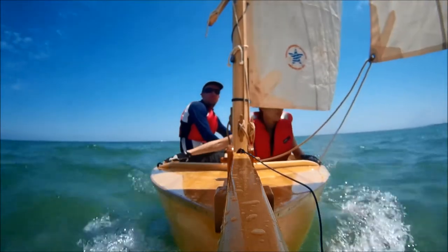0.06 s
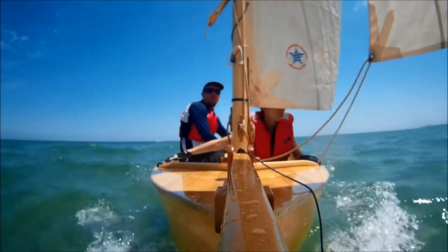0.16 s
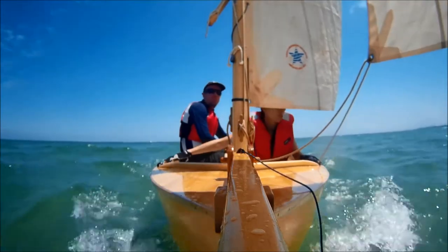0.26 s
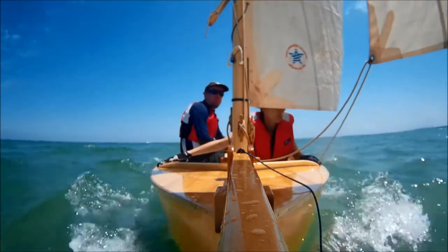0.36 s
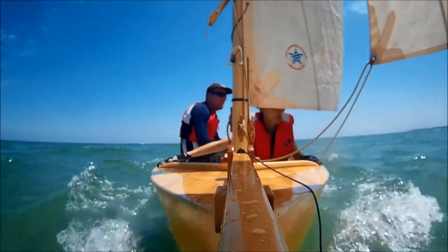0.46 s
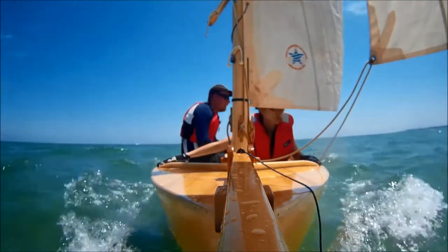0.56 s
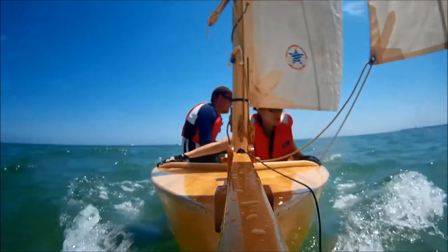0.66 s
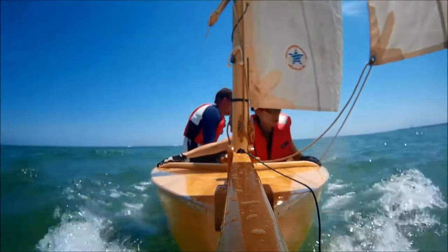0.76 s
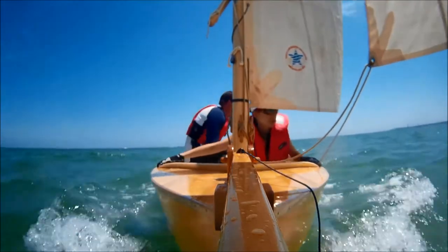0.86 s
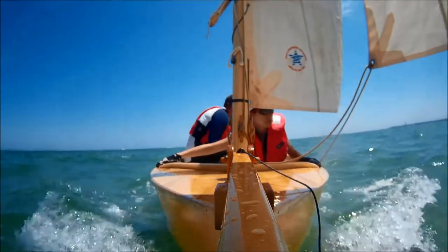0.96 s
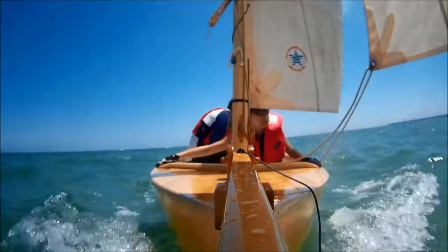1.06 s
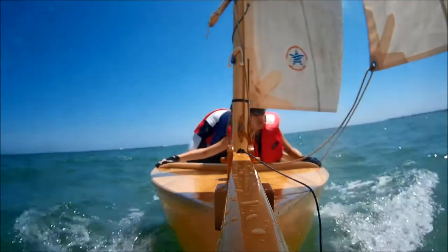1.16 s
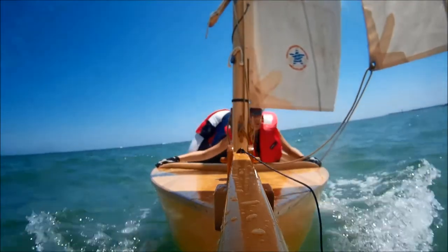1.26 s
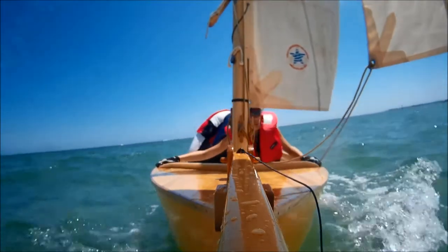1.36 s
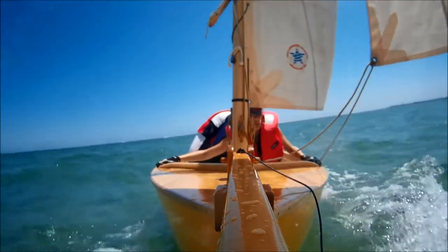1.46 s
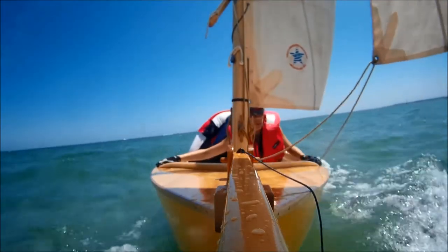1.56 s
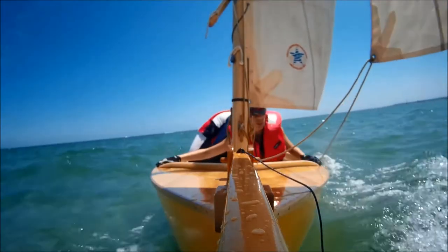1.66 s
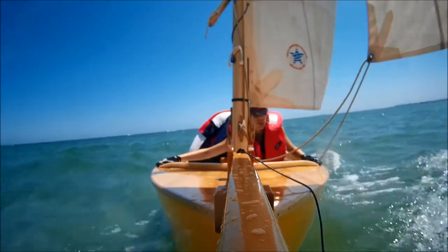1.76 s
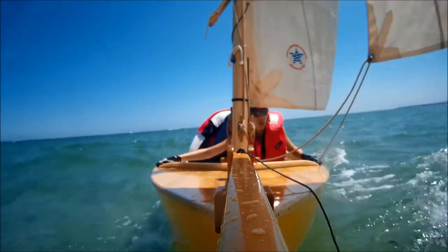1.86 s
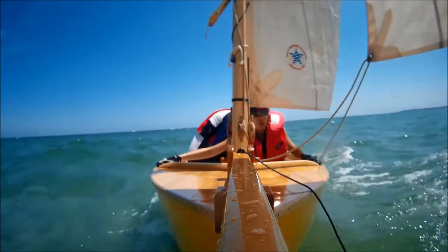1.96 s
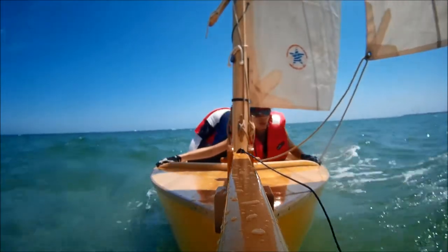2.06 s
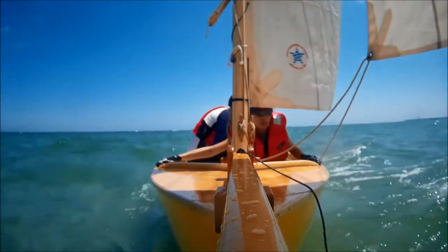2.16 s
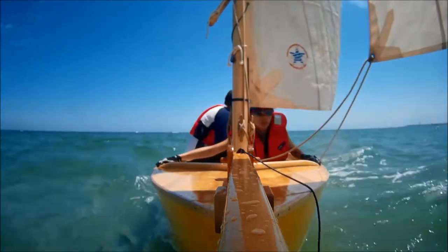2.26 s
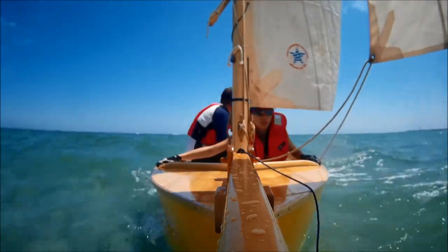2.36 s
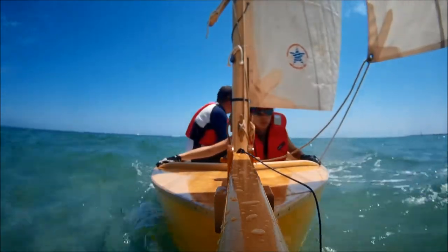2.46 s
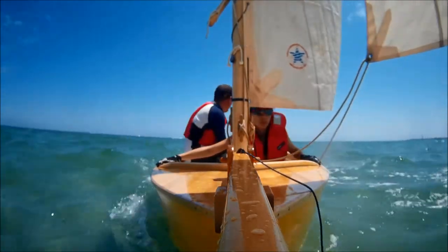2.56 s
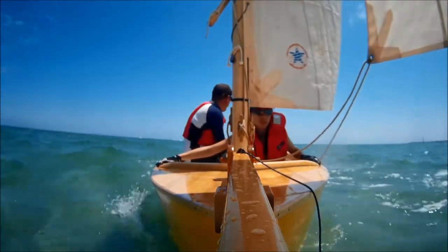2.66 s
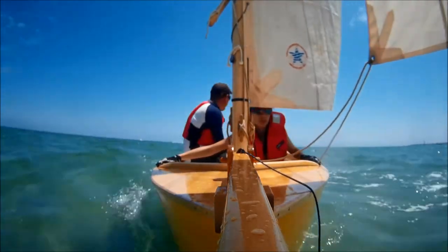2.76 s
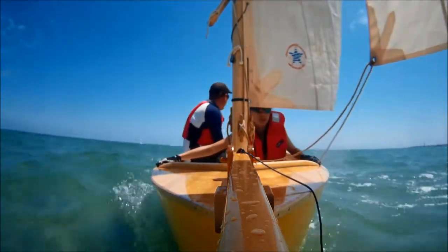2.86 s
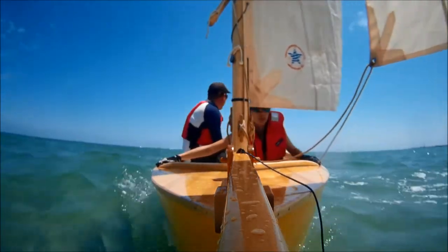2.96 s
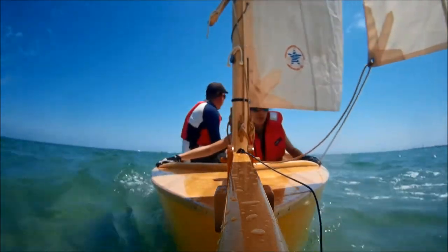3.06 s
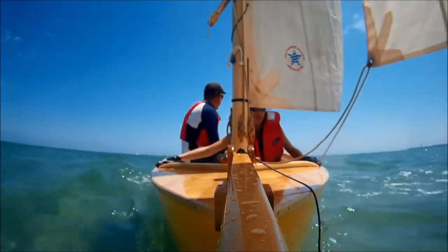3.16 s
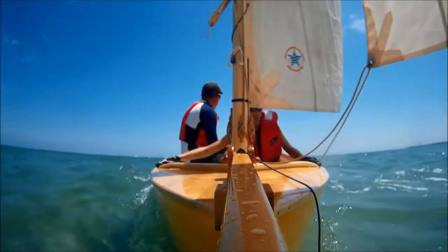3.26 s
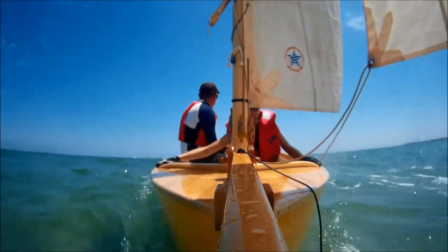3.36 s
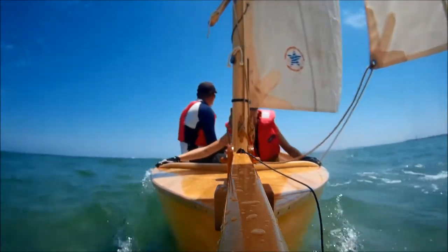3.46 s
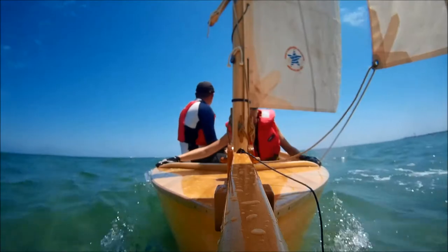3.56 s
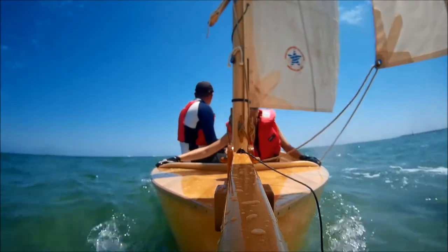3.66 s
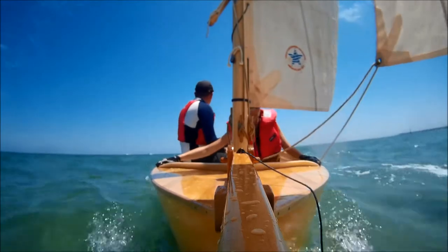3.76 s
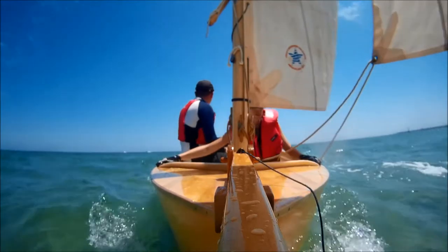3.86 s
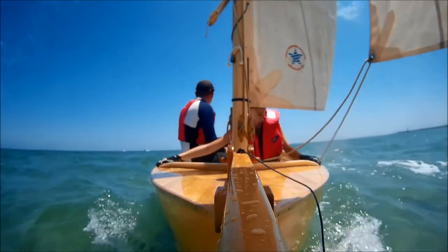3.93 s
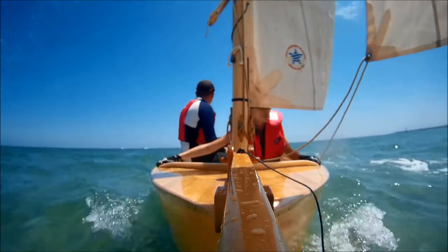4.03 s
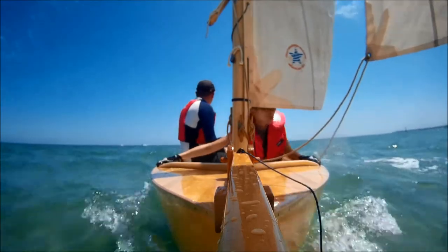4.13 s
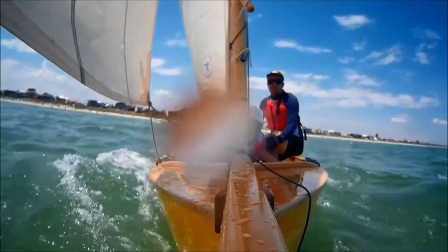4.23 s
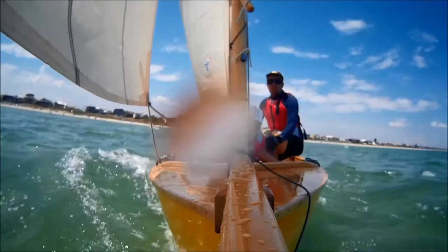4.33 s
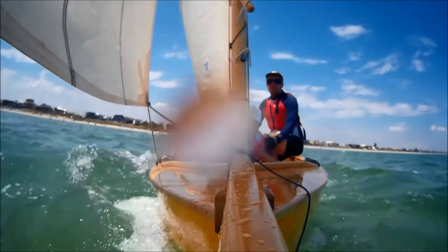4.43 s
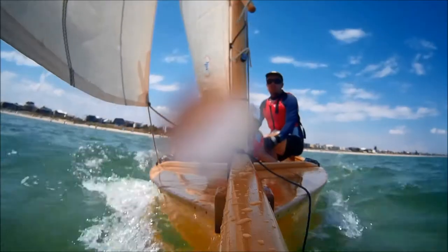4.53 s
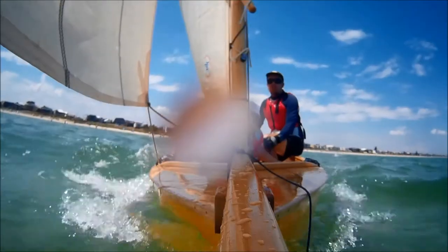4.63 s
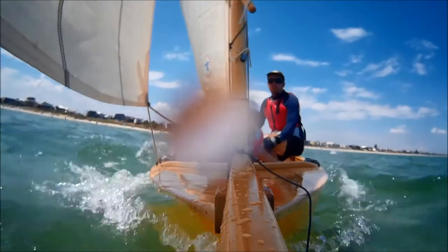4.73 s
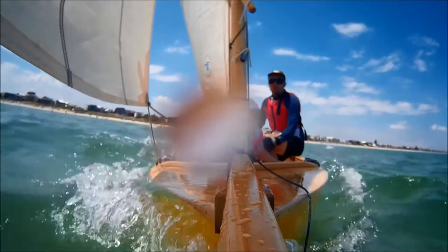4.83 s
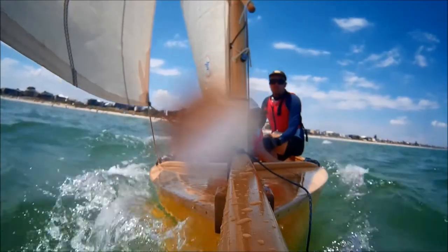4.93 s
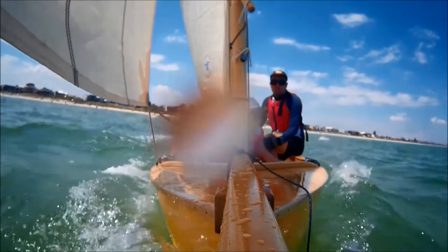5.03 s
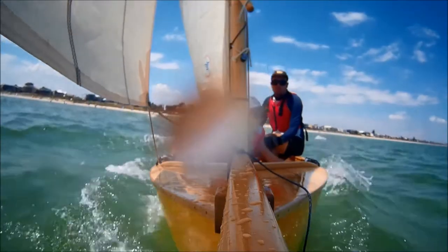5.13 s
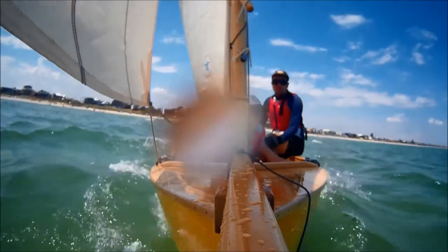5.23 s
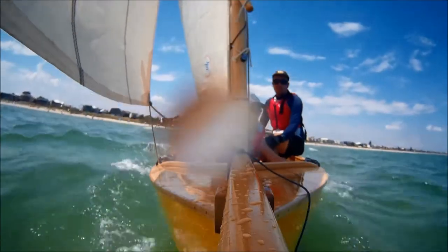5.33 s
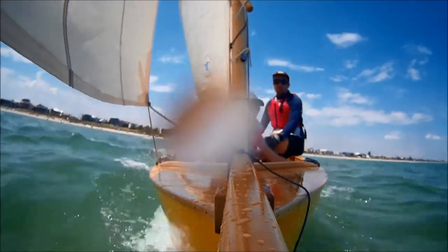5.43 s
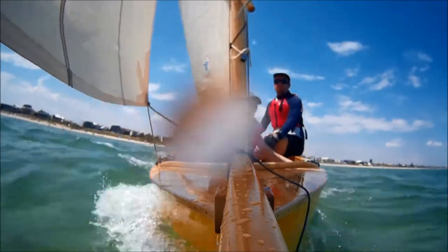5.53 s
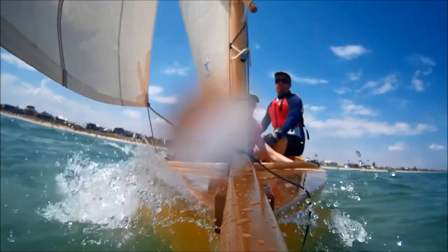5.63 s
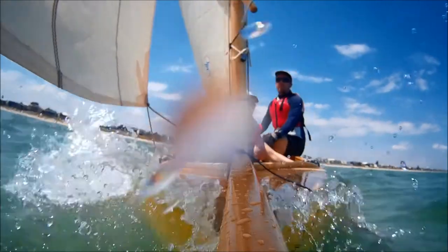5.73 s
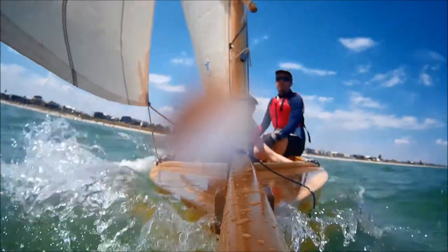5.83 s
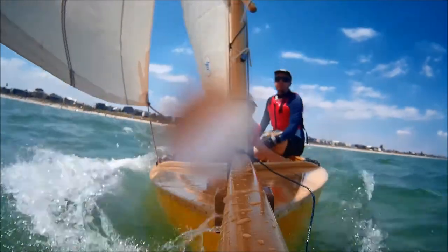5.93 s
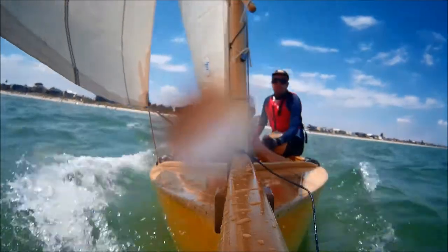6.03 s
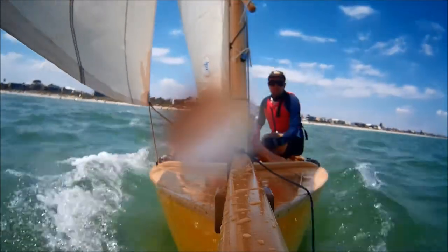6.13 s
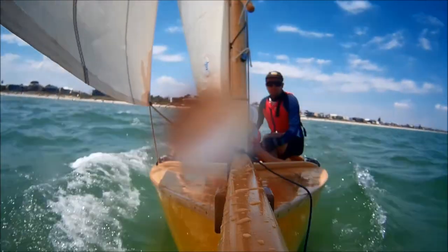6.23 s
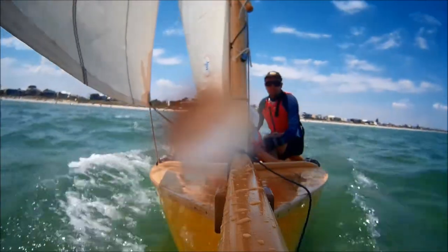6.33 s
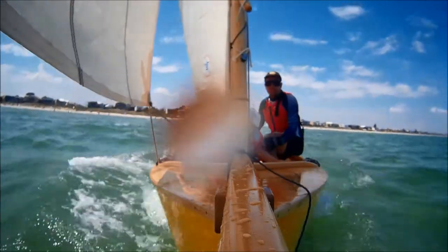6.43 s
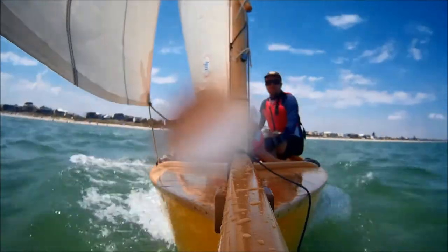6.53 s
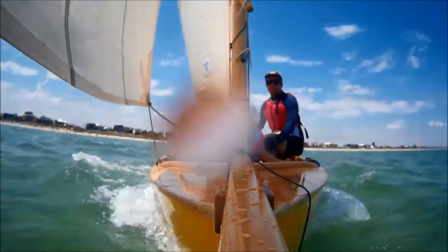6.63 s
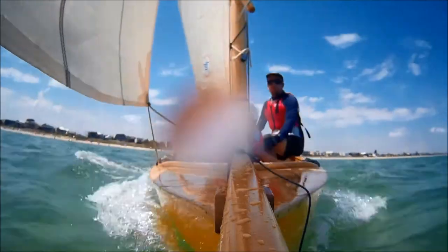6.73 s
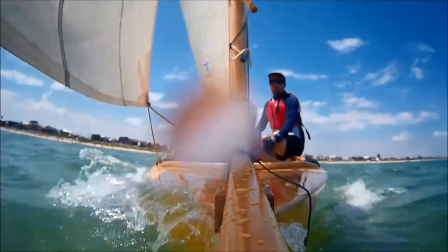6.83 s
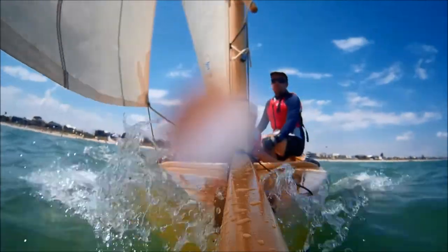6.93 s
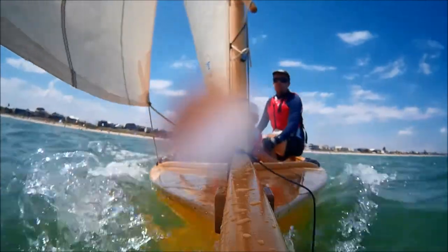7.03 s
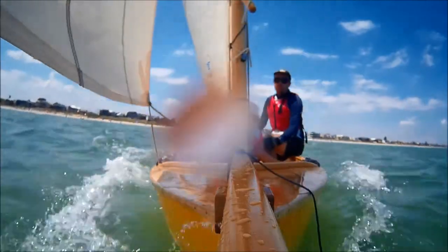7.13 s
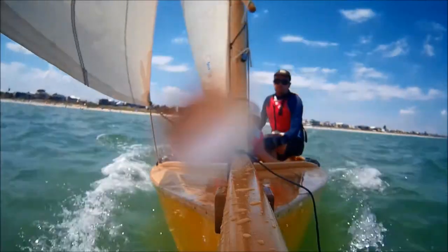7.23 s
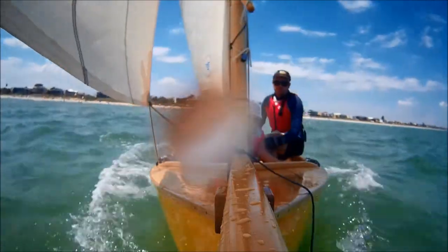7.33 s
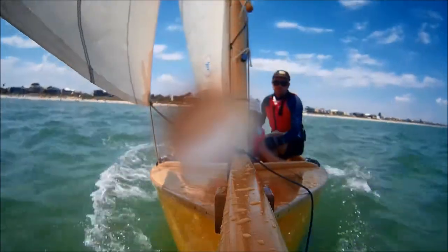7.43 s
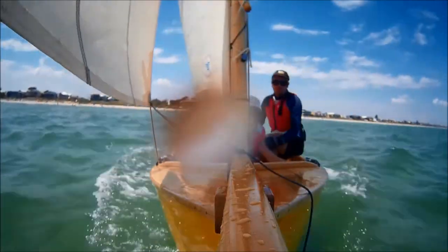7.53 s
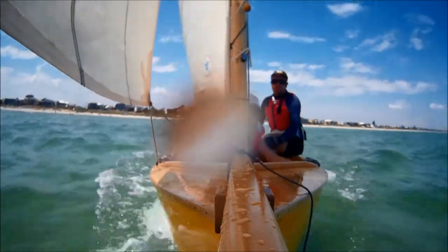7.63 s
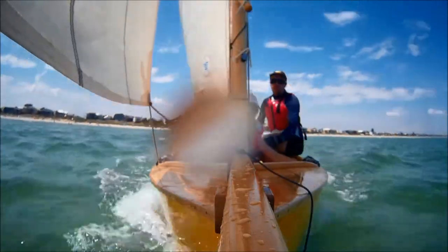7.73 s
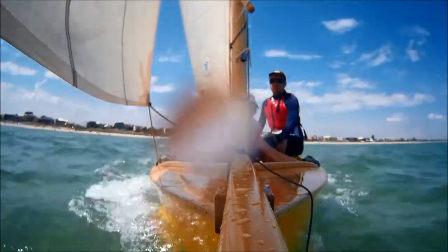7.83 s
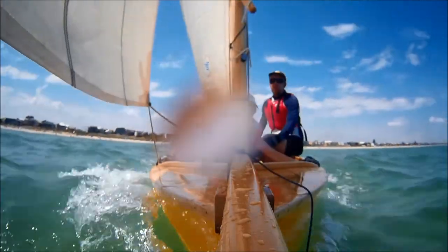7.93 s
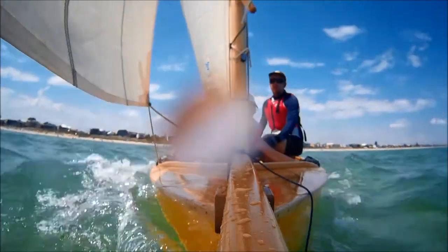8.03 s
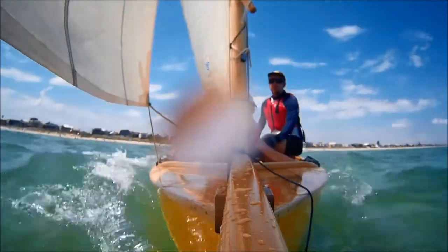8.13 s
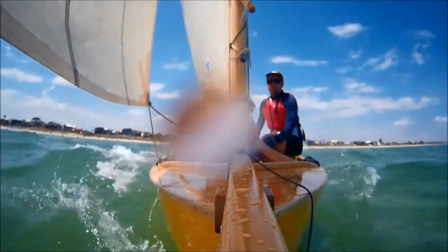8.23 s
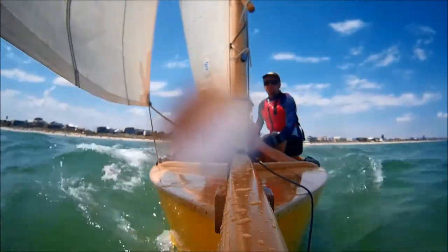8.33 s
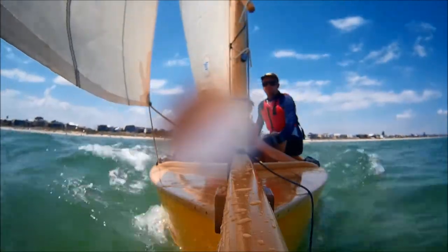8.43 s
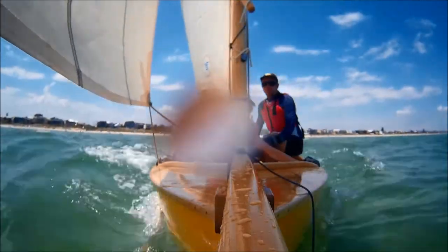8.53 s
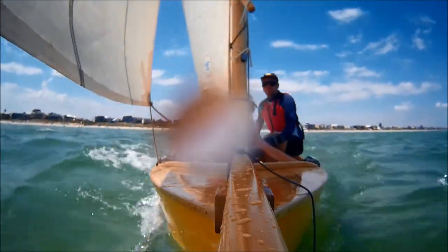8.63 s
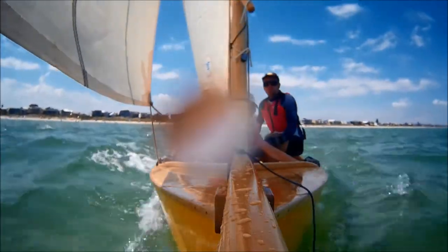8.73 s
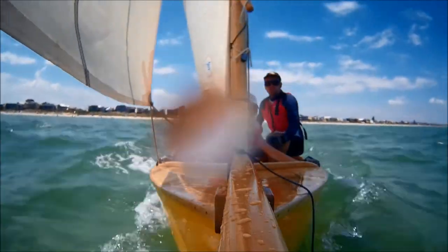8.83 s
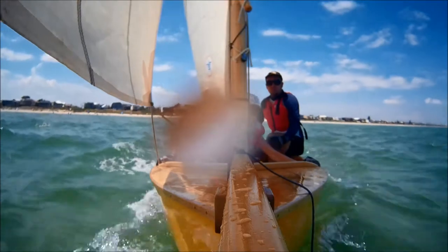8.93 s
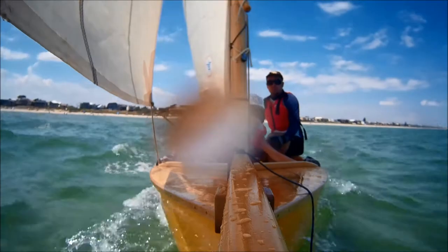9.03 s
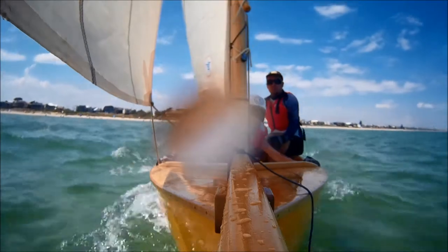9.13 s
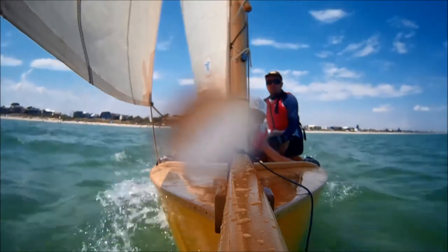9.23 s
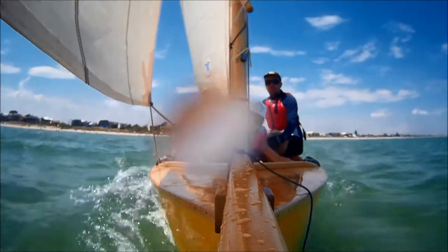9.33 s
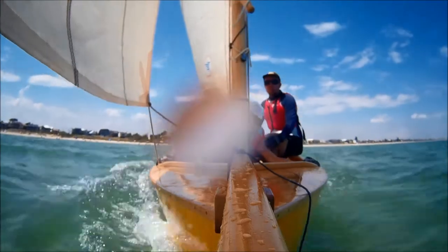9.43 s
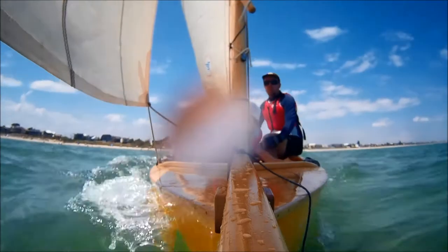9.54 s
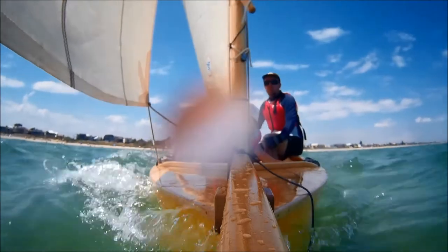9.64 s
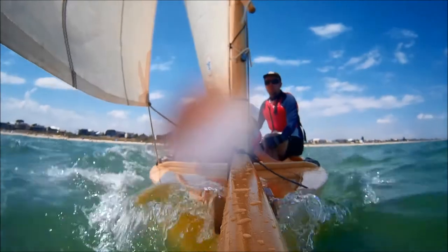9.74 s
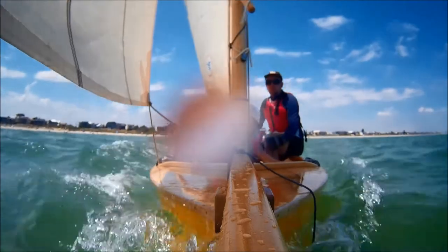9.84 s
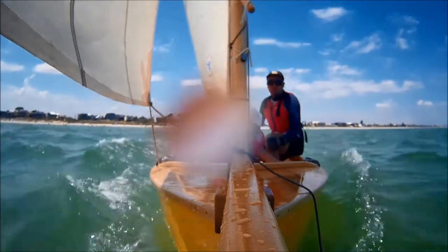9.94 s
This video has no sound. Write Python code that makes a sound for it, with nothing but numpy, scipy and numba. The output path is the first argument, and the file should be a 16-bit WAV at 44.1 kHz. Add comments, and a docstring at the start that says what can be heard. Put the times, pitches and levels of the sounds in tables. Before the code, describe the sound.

Close at the bow of a small wooden sailing boat on open, choppy water, a light wash trickles with drips and small slaps. Then waves break hard, with sharp slaps, gurgles and rising air gulps. It eases to scattered splashes before a last heavy one with a low thud. The microphone sits in a sealed case on the spar, so the water sounds boxy and muffled over faint hiss.

```python
"""Water along a small wooden sailing boat, heard up close by a camera in a sealed case on the bowsprit.
First a light wash, drips and small slaps; from about 4 s to 7 s waves break hard on the bow, among gliding
tones, mostly air gulps; then it eases until a last heavy splash near 9.6 s. Throughout, bubbles and noise make
the wash, noise bursts the slaps and drops, sines the gliding tones; the resonant case colours most of the water.
The spar hums low with its jolts, under the camera's own hiss and thin whine."""
import sys
import numpy as np
from scipy import signal
from scipy.fft import rfft, irfft
from scipy.io import wavfile
from scipy.ndimage import uniform_filter1d
from numba import njit

SR = 44100
rng = np.random.default_rng(int(sys.argv[2]) if len(sys.argv) > 2 else 0)


def bounce(signal):
    """Save signal as a 16-bit WAV file at the path given by the first command-line argument."""
    frames = np.transpose(np.atleast_2d(signal))
    limited = np.clip(frames, -1, 1)
    pcm = np.round(limited * 32767).astype(np.int16)
    wavfile.write(sys.argv[1], SR, pcm)


N = 440559  # samples

# Steady wash along the planks between the waves: start_s, splash_db, spray_minus_splash_db
CALM = [(0, -57, -0.5), (.7, -56.5, -1), (1.4, -57, -2), (2.2, -59, -6.5), (2.8, -66.5, -5.5),
        (3.5, -63.5, -5.5), (4.0, -53.5, -5), (4.9, -53, -5), (5.9, -45.5, -4.5), (6.37, -60, -6.5),
        (7.0, -53, -2), (7.46, -59, -5), (8.0, -55.5, -5), (8.85, -72, -3), (9.3, -58, -2.5),
        (9.99, -78, 0)]


def undb(db):
    """Gain of a level in dB."""
    return 10 ** (np.asarray(db) / 20)


def unit(x):
    """Scaled to rms 1."""
    return x / np.sqrt(np.mean(x ** 2))


def peak(x, db):
    """Scaled to a peak level in dB."""
    return undb(db) * x / np.abs(x).max()


def band(x, lo_hz, hi_hz):
    """Band-pass."""
    return signal.sosfilt(signal.butter(2, [lo_hz, hi_hz], "bandpass", fs=SR, output="sos"), x)


def ring(x, hz, width_hz):
    """One resonance."""
    return signal.lfilter(*signal.iirpeak(hz, hz / width_hz, fs=SR), x)


def walk(rate_hz):
    """Random levels, each held for 1 / rate and smoothed twice over that time; rms 1."""
    hold = int(SR / rate_hz)
    steps = np.repeat(rng.standard_normal(N // hold + 1), hold)
    return unit(uniform_filter1d(uniform_filter1d(steps, hold), hold)[:N])


def columns(table):
    """Each column of a curve, interpolated sample by sample."""
    s, *cols = np.transpose(table)
    return [np.interp(np.arange(N) / SR, s, c) for c in cols]


def add(out, s, sound):
    """Mixes a short sound in at time s."""
    i = int(s * SR)
    out[i:i + len(sound)] += sound[:N - i]


def swells(crest_s, db, rise_s, fall_s, rest_db, order):
    """Level in dB of swells that climb to a crest and die away, over a resting level; order 1 is peaked, 2 rounded."""
    swell_db = 12  # gained in the rise time, lost in the fall time
    power, t = undb(2 * rest_db) + np.zeros(N), np.arange(N) / SR
    for s, top_db, rise, fall in zip(crest_s, db, rise_s, fall_s):
        near = slice(max(int((s - 4 * rise) * SR), 0), int((s + 4 * fall) * SR))
        late = t[near] - s
        distance = np.maximum(late / fall, -late / rise)
        power[near] += undb(2 * (top_db - swell_db * distance ** order))
    return 10 * np.log10(power)


def wash(case):
    """Large bubbles slosh and gurgle, small ones splash, droplets crackle; mist rises with the spray."""
    # Waves breaking on the bow, levels before the unevenness:
    # crest_s, splash_db, gurgle_minus_splash_db, spray_minus_splash_db, rise_s, fall_s
    wave_table = [(0.0, -41.5, -1.5, -10.5, .05, 0.12), (.3, -53, 3, -7, 0.14, 0.11),
                  (1.62, -49.5, -7, -4, 0.03, 0.11), (1.86, -46, -1, -9, 0.053, 0.15),
                  (1.97, -40, -7, -8, 0.021, 0.063), (2.29, -58, -1, -8, 0.04, 0.12),
                  (2.7, -52, -3.5, -11.5, 0.29, 0.15), (3.03, -52.5, 1.5, -6.5, 0.17, 0.65),
                  (3.6, -62.5, 15.5, -16, 0.027, 0.14), (4.24, -42.5, 1.5, -3, 0.12, .1),
                  (4.311, -26, 0, -14.5, 0.026, 0.11), (4.45, -34, -0.5, -4.5, .1, 0.045),
                  (4.6, -33.5, -2, -8.5, 0.097, 0.14), (4.73, -39, -8, -6, 0.15, 0.054),
                  (5.15, -50.5, 8, 2, 0.12, 0.17), (5.4, -25, -7, -14.5, 0.085, 0.073),
                  (5.54, -28, -4.5, -5.5, .12, 0.065), (5.63, -22.5, -0.5, -9, .03, 0.085),
                  (5.98, -58, 7, -9, 0.3, 0.53), (6.66, -43.5, 0, -10.5, 0.21, .1),
                  (6.829, -29, -2, -5.5, 0.11, 0.11), (7.15, -38, -0.5, -2.5, .07, 0.096),
                  (7.651, -46, 3, -3, 0.13, 0.14), (7.87, -55.5, 11, -3, 0.04, 0.05),
                  (8.201, -32, -3, -16, 0.054, 0.053), (8.38, -48.5, -7, -9.5, 0.098, 0.91),
                  (8.74, -44, 5.5, -9, 0.14, 0.048), (9.07, -47.5, -1, -6, 0.17, .15),
                  (9.46, -34, -4, -11, 0.099, .08), (9.641, -31, -2, -7, .1, 0.11),
                  (9.99, -46, -1, -5, 0.045, .1)]
    # Low slosh under the bow, level before the unevenness: start_s, level_db
    slosh_curve = [(0.0, -62), (1.33, -47), (1.58, -63), (2.09, -58), (2.59, -64), (3.17, -53), (3.39, -62),
                   (3.81, -50.5), (4.5, -48.5), (5.2, -61), (5.53, -43), (6.3, -62), (6.8, -47),
                   (7.29, -54.5), (9.07, -65.5), (9.6, -42.5), (9.77, -53.5), (9.99, -64)]
    calm_gurgle_db = 1.5  # relative to the calm splash
    mist_mean_db, mist_follow = -82, 0.77  # follow: dB of mist per dB of spray
    shared_db = 1.7  # unevenness common to all bubble sizes

    s, db, gurgle_db, spray_db, rise, fall = np.transpose(wave_table)
    calm_db, calm_spray_db = columns(CALM)
    slosh_db, = columns(slosh_curve)
    splash_db = swells(s, db, rise, fall, calm_db, order=1)
    gurgle_db = swells(s, db + gurgle_db, rise, fall, calm_db + calm_gurgle_db, order=1)
    spray_db = swells(s, db + spray_db, rise, fall, calm_db + calm_spray_db, order=1)
    mist_db = mist_mean_db + mist_follow * (spray_db - spray_db.mean())

    slosh = froth(case, 105, 330, count=1200, cycles=6, scatter_db=2.5, rush_db=2, flicker_db=2)
    gurgle = froth(case, 330, 900, count=2000, cycles=11, scatter_db=3.5, rush_db=-4, flicker_db=3)
    splash = froth(case, 900, 2000, count=2500, cycles=20, scatter_db=4, rush_db=-5, flicker_db=3)
    spray = froth(case, 2000, 5000, count=5000, cycles=18, scatter_db=4, rush_db=-1, flicker_db=1.5)
    mist = froth(case, 5000, 12000, count=8000, cycles=12, scatter_db=4.5, rush_db=-3, flicker_db=3)
    low = undb(slosh_db) * slosh + undb(gurgle_db) * gurgle
    high = undb(splash_db) * splash + undb(spray_db) * spray + undb(mist_db) * mist
    return undb(shared_db * walk(14)) * (low + high)


def froth(case, lo_hz, hi_hz, count, cycles, scatter_db, rush_db, flicker_db):
    """Bubbles of one size range over flickering rush, in gently uneven patches, heard through the case."""
    uneven_db = 2.2
    when, pitch, strength, life = rng.random((count, 4)).T
    hz = lo_hz * (hi_hz / lo_hz) ** pitch
    size = undb(-scatter_db * np.log(1 - .98 * strength))  # many weak, few strong
    start = (when * N).astype(np.int64)
    grains = bubbles(N, start, 2 * np.pi * hz / SR, cycles * (.5 + life), size, .08)
    rush = band(rng.standard_normal(N), lo_hz, hi_hz) * undb(flicker_db * walk(30))
    mix = (unit(grains) + undb(rush_db) * unit(rush)) * undb(uneven_db * walk(16))
    return unit(band(signal.fftconvolve(mix, case)[:N], .7 * lo_hz, 1.2 * hi_hz))


@njit
def bubbles(n, start, step, cycles, size, glide):
    """Each bubble is a dying sine that rises in pitch, by the share glide over each life."""
    out = np.zeros(n)
    for k in range(len(start)):
        life = cycles[k] * 2 * np.pi / step[k]  # samples
        z, p = size[k] + 0j, np.exp(1j * step[k] - 3 / life)
        turn = np.exp(1j * step[k] * glide / life)
        for i in range(start[k], min(n, start[k] + int(2 * life))):
            z *= p
            p *= turn
            out[i] += z.imag
    return out


def slaps(case, count=90):
    """The loud slaps of water, and a patter of small chance ones that follows the level of the steady wash."""
    # Slaps on the hull: start_s, peak_db, pitch_hz (before the case)
    slap_table = [(0.064, -31.5, 1310), (0.228, -35.5, 740), (0.327, -37, 1340), (0.795, -39.5, 1240),
                  (0.899, -38, 1130), (1.225, -37, 692), (1.5, -44, 622), (1.539, -35, 662),
                  (1.863, -29.5, 1340), (1.954, -37, 1440), (1.969, -27, 1800), (2.071, -42, 1440),
                  (2.198, -49, 571), (2.258, -44, 1490), (2.285, -36.5, 1390), (2.362, -39, 1320),
                  (2.542, -41, 1295), (2.677, -38.5, 1370), (2.989, -37, 1500), (3.013, -31, 1297),
                  (3.035, -37, 1310), (3.183, -41, 1238), (3.269, -38, 583), (3.666, -38, 1490),
                  (3.757, -38.5, 685), (3.931, -32, 1334), (4.076, -33.5, 1806), (4.164, -23, 1148),
                  (4.201, -24.5, 1450), (4.282, -21, 1125), (4.316, -10.5, 1130), (4.401, -26, 1610),
                  (4.563, -22, 1430), (4.604, -21, 549), (4.716, -10.5, 1710), (4.76, -24, 1180),
                  (4.815, -32.5, 555), (4.964, -30, 1767), (5.05, -32.5, 1460), (5.272, -29, 1730),
                  (5.292, -19, 1510), (5.323, -19.5, 1250), (5.348, -19.5, 557), (5.447, -18, 834),
                  (5.526, -18.5, 1450), (5.579, -7.5, 1150), (5.643, -14, 1420), (5.67, -20, 1440),
                  (5.81, -30, 762), (6.501, -20.5, 999), (6.587, -17.5, 1700), (6.627, -17, 904),
                  (6.682, -30.5, 700), (6.778, -26, 1496), (6.813, -5.5, 1795), (6.829, -17, 1480),
                  (6.906, -28, 1470), (6.949, -29, 1430), (7.126, -32, 627), (7.575, -31, 1458),
                  (7.627, -31, 754), (7.663, -25, 726), (7.678, -20, 812), (7.862, -29, 735),
                  (8.141, -22, 813), (8.206, -25.5, 566), (8.332, -36.5, 759), (8.963, -35.5, 1224),
                  (9.335, -31, 1550), (9.405, -30, 1455), (9.447, -25, 1480), (9.511, -21.5, 1580),
                  (9.555, -29, 1510), (9.607, -25, 1453), (9.66, -15, 972), (9.698, -19.5, 738),
                  (9.719, -18.5, 1790)]
    out = np.zeros(N)
    for s, peak_db, hz in slap_table:
        add(out, s, slap(case, peak_db, hz, .0065))
    for at, size, pitch in rng.random((count, 3)):
        s = at * N / SR
        calm_db = np.interp(s, *np.transpose(CALM)[:2])
        # peaks 9 to 19 dB above the calm splash level
        add(out, s, slap(case, calm_db + 9 + 10 * size, 550 * 3.3 ** pitch, .004))
    return out


def slap(case, peak_db, hz, decay_s):
    """Water piles on within a few ms: a crack, then a soft-edged burst around its own pitch, ring the case."""
    rise_s, crack_s, crack_db = 0.00048, .001, -7  # crack peak relative to the body
    t = np.arange(int(.08 * SR)) / SR
    shape = (1 - np.exp(-t / rise_s)) * np.exp(-t / decay_s)
    body = peak(ring(shape * rng.standard_normal(len(t)), hz, 0.15 * hz), 0)
    crack = peak(np.exp(-t / crack_s) * rng.standard_normal(len(t)), crack_db)
    return peak(signal.fftconvolve(body + crack, case), peak_db)


def drops(case):
    """Drops striking the case ping briefly at their own pitch; fine spray only ticks."""
    # Drops, heard through the case: start_s, peak_db, pitch_hz (before the case)
    drop_table = [(0.648, -42, 3020), (1.6212, -49, 4240), (1.6483, -41, 4420), (1.6816, -50, 4210),
                  (3.757, -45.5, 3475), (3.931, -46, 2980), (4.1613, -33.5, 2310), (4.1989, -36, 2330),
                  (4.2912, -30, 2220), (4.3133, -22, 2640), (4.4415, -33, 3100), (4.6116, -36, 2460),
                  (4.6364, -33, 2960), (4.7075, -29, 2370), (5.3732, -33, 2780), (5.3872, -33, 2730),
                  (5.4324, -33, 3060), (5.509, -33, 3070), (5.5769, -11, 2340), (5.6054, -20, 3200),
                  (5.6374, -34, 3170), (5.671, -25.5, 3100), (5.7908, -38, 4100), (6.6125, -33, 2970),
                  (6.6387, -30, 2980), (6.7286, -38, 2830), (6.7587, -35, 2380), (6.8116, -11.5, 3097),
                  (6.8316, -21, 2490), (6.8734, -32, 3210), (7.322, -46, 3030), (7.5591, -41, 3010),
                  (7.6283, -39.5, 3060), (7.6959, -41.5, 3040), (8.1436, -39, 3040), (8.1908, -41, 3020),
                  (8.9977, -46, 3020), (9.31, -40, 2490), (9.5624, -35, 3000), (9.5978, -34, 3010),
                  (9.657, -18, 3140), (9.6994, -11, 2600), (9.7253, -16.5, 2580), (9.7814, -37, 3050),
                  (9.8505, -35.5, 3010)]
    # Fine spray ticking on the case, without its resonances: start_s, peak_db, centre_hz
    tick_table = [(1.8622, -46, 5700), (1.9664, -55, 7700), (4.1989, -38.5, 5150), (4.3664, -58, 5210),
                  (4.6399, -51, 5520), (4.705, -53, 5210), (5.5779, -41, 5120), (5.6351, -51, 6030),
                  (5.672, -34, 5090), (5.7266, -41, 5850), (5.7851, -44, 7030), (6.6406, -52, 5370),
                  (6.8135, -42, 5070), (6.8446, -38, 5100), (6.86, -37, 5870), (7.1372, -48, 5650),
                  (7.1586, -42, 5010), (9.6565, -47, 5630), (9.6979, -35, 5050)]
    out, t = np.zeros(N), np.arange(int(0.037 * SR)) / SR
    for s, peak_db, hz in drop_table:
        burst = rng.standard_normal(len(t)) * (1 - np.exp(-t / 0.0014)) * np.exp(-t / 0.0026)
        ping = ring(ring(burst, hz, 1.07 * hz), hz, 0.11 * hz)
        add(out, s, peak(signal.fftconvolve(ping, case), peak_db))
    for s, peak_db, hz in tick_table:
        burst = rng.standard_normal(len(t)) * np.exp(-t / 0.002)
        add(out, s, peak(band(burst, .8 * hz, 1.4 * hz), peak_db))
    return out


def gliding_tones():
    """Sines that swell, slide in pitch and fade, with one random shake on both level and phase."""
    # Mostly air gulps; the two high falling ones near 6.1 s perhaps a creak.
    # Level and pitch before the shake: start_s, start_hz, end_hz, length_s, level_db
    glide_table = [(0.079, 304, 312, 0.1, -46.5), (0.979, 282, 293, 0.065, -46.5),
                   (1.211, 629, 720, 0.046, -50), (1.507, 239.6, 299, 0.031, -39.5),
                   (1.529, 633, 805, .04, -45), (1.884, 282, 310, 0.03, -39),
                   (4.306, 123, 155.3, 0.079, -26), (4.307, 198, 260, 0.013, -22),
                   (4.379, 230, 270, 0.032, -24.5), (4.574, 251.6, 246, 0.1, -31),
                   (4.587, 519, 661, 0.053, -26), (5.112, 246, 499, 0.091, -28.5),
                   (5.149, 485, 620, 0.041, -37), (5.352, 592, 525, 0.054, -27),
                   (5.388, 406, 481, 0.023, -21), (5.413, 497, 893, 0.051, -28.5),
                   (5.596, 383, 536, 0.036, -14), (6.042, 417, 452, 0.049, -37),
                   (6.1, 1445, 1195, 0.091, -51), (6.145, 1580, 1456, 0.032, -40.5),
                   (6.84, 686, 724, 0.014, -22), (6.899, 1446, 1460, 0.021, -30),
                   (7.216, 568, 594, 0.029, -37.5), (7.383, 538, 626, 0.048, -35.5),
                   (7.675, 763, 847, 0.033, -26), (7.859, 243.3, 284.5, 0.048, -35),
                   (8.202, 541, 580, 0.031, -31), (8.216, 1145, 1230, 0.046, -34),
                   (8.22, 422, 423, 0.066, -40), (9.395, 556, 601, 0.027, -32),
                   (9.442, 760, 795, 0.026, -31.5), (9.664, 923, 1000, 0.08, -28.5),
                   (9.719, 380, 421, 0.025, -23.5)]
    out = np.zeros(N)
    for s, start_hz, end_hz, length, db in glide_table:
        x = np.linspace(0, 1, int(length * SR))
        shake = uniform_filter1d(uniform_filter1d(rng.standard_normal(8192), size=200), size=24)[:len(x)]
        phase = 2 * np.pi * np.cumsum(start_hz + (end_hz - start_hz) * x) / SR
        swell = np.sin(np.pi * x ** 0.46) * (1 + 4.1 * shake)
        add(out, s, undb(db) * swell * np.sin(phase + 2.3 * shake))
    return out


def spar():
    """Each jolt swells the bending mode at its own pitch; an overtone follows it, wind buffeting follows only in part."""
    # Jolts that set the spar humming: crest_s, level_db, pitch_hz, fall_s
    jolt_table = [(.02, -41, 61.4, 0.054), (.11, -46, 62, .05), (.28, -42, 60.6, 0.053),
                  (.39, -45.5, 61, 0.046), (.72, -53.5, 70.3, 0.19), (.98, -53, 65.8, .2),
                  (1.21, -40, 71.2, 0.054), (1.31, -43, 69.6, .09), (1.47, -41.5, 70.1, 0.067),
                  (1.55, -36.5, 70.6, 0.064), (1.74, -50, 72.4, .1), (1.86, -39, 69.3, 0.054),
                  (1.97, -36, 64.9, 0.049), (2.09, -44, 64, 0.086), (2.21, -43, 69.2, 0.065),
                  (2.46, -56, 66.4, .12), (2.66, -38.5, 64, 0.11), (2.97, -38.5, 69, 0.072),
                  (3.07, -38, 68.3, .07), (3.36, -41, 70.3, 0.088), (3.65, -44, 69.5, 0.039),
                  (3.76, -47, 66, .07), (3.92, -42, 61.9, 0.092), (4.08, -37.5, 67.6, 0.078),
                  (4.17, -37.5, 67.9, 0.11), (4.33, -31, 73, 0.057), (4.4, -38.5, 73, 0.053),
                  (4.69, -39.5, 69.4, 0.14), (4.84, -40, 70.2, 0.059), (5.02, -45, 73, 0.083),
                  (5.13, -43, 72, 0.15), (5.47, -28.5, 70.9, 0.11), (5.62, -32, 76.1, 0.071),
                  (5.89, -38.5, 73, .15), (6.12, -42, 74.8, .12), (6.2, -40.5, 72.5, 0.083),
                  (6.49, -42.5, 75, 0.054), (6.71, -41, 74.4, .09), (6.84, -32.5, 74.2, 0.076),
                  (7.11, -36, 74.4, 0.17), (7.27, -42.5, 68, .1), (7.6, -31, 70, .08),
                  (7.7, -43, 71.5, 0.088), (7.92, -42.5, 71.1, 0.15), (8.2, -40.5, 69.7, 0.096),
                  (8.29, -42.5, 74, .05), (8.5, -48.5, 71, .17), (8.71, -40, 72, 0.072),
                  (9.0, -52, 70, .06), (9.09, -45, 68.3, .07), (9.24, -38.5, 67.7, 0.076),
                  (9.34, -38, 68, .11), (9.6, -21.5, 66.9, 0.058), (9.67, -28.5, 68, .09),
                  (9.87, -45.5, 66.3, .12)]
    rise_share, rest_db = 0.67, -62  # rise time over fall time; hum left between jolts
    unsteady_hz, overtone_db = 14, -21.5  # overtone relative to the mode
    buffet_mean_db, buffet_follow = -51, 0.58  # follow: dB of buffeting per dB of hum

    s, db, hz, fall = np.transpose(jolt_table)
    db = swells(s, db, rise_share * fall, fall, rest_db, order=2)
    hz = np.interp(np.arange(N) / SR, s, hz)
    rough = undb(2.0 * walk(unsteady_hz))
    phase = 2 * np.pi * np.cumsum(hz) / SR + .4 * walk(unsteady_hz)
    mode = unit(rough * np.sin(phase))
    overtone = unit(ring(rng.standard_normal(N), 116, 57))
    buffet = unit(band(rng.standard_normal(N), 37.84, 80.96))
    buffet_db = buffet_mean_db + buffet_follow * (db - db.mean())
    return undb(db) * (mode + undb(overtone_db) * overtone) + undb(buffet_db) * buffet


def case_response(size=8192):
    """Impulse response of the sealed case: causal (minimum phase), from the cepstrum of its log gain."""
    # Sound let in by the case, before the resonances: frequency_hz, gain_db
    case_curve = [(100, -2), (180, -0.5), (350, -7), (640, -2), (800, -0.5), (905, -9), (1160, -3.5),
                  (1800, -2), (2070, -21.5), (3080, -20.5), (4600, -22), (4950, -32), (7000, -31),
                  (14000, -36)]
    # Resonances of the case: centre_hz, width_hz, boost_db
    mode_table = [(266, 160, 9), (421.6, 13.5, 7), (580.7, 13.3, 6.5), (730, 34, 5.5), (1156, 36, 6),
                  (1442, 162, 7), (1777, 35, 4), (2310, 43, 5), (2540, 30, 3.5), (3046, 155, 8),
                  (4240, 61, 7)]
    hz = np.arange(size // 2 + 1) * SR / size + 1  # 1 Hz up, to keep the log finite
    curve_hz, curve_db = np.transpose(case_curve)
    db = np.interp(np.log(hz), np.log(curve_hz), curve_db)
    for centre_hz, width_hz, boost_db in mode_table:
        db = db + boost_db / (1 + (2 * (hz - centre_hz) / width_hz) ** 2)
    cep = irfft(np.log(undb(db)))
    cep[1:size // 2] *= 2  # fold the cepstrum onto positive times
    cep[size // 2 + 1:] = 0
    return irfft(np.exp(rfft(cep)))[:size // 2]


def scene():
    """Wash, slaps and drops at the case, with the gliding tones and the humming spar."""
    case = case_response()
    return (wash(case) + slaps(case) + drops(case) + gliding_tones() + spar())[None]


def camera_hiss():
    """Circuit noise, gently tilted down towards the treble."""
    tilt_hz = 11900
    return unit(signal.lfilter([1], [1, -np.exp(-2 * np.pi * tilt_hz / SR)], rng.standard_normal(N)))


def camera_whine():
    """A thin tone whose phase flips to and fro while its strength throbs."""
    whine_hz, flip_hz, flip_rad, throb = 9519.3, 36.33, 1.1, .26
    t = np.arange(N) / SR
    tone, flip = 2 * np.pi * whine_hz * t, 2 * np.pi * flip_hz * t
    flipping = np.sin(tone + flip_rad * np.tanh(12 * np.sin(flip)))
    return unit(flipping + throb * np.cos(flip) * np.sin(tone))


def record(dry):
    """Camera hiss and whine sink whenever the incoming sound is quiet; the top is cut."""
    hiss_db, hiss_swing_db = -62, 3  # level at the threshold, most it moves up or down
    whine_db, whine_swing_db = -69.5, 5.5
    threshold_db, knee_db, window_s = -33.5, 9, .075
    loud_db = 10 * np.log10(uniform_filter1d(dry ** 2, int(window_s * SR)) + 1e-9)
    lift = np.tanh((loud_db - threshold_db) / knee_db)
    hiss = undb(hiss_db + hiss_swing_db * lift) * camera_hiss()
    whine = undb(whine_db + whine_swing_db * lift) * camera_whine()
    soft = signal.sosfilt(signal.butter(8, 15200, fs=SR, output="sos"), dry + hiss + whine)
    return signal.sosfilt(signal.ellip(12, .2, 90, 15700, fs=SR, output="sos"), soft)  # steep final cut


dry = scene()
out = record(dry)
bounce(out)
```